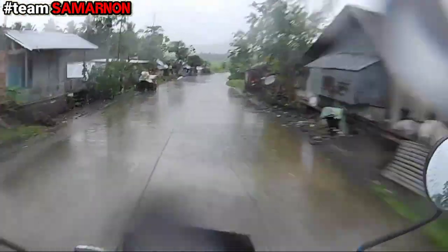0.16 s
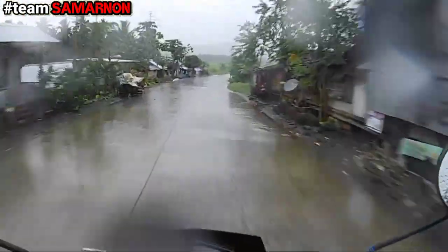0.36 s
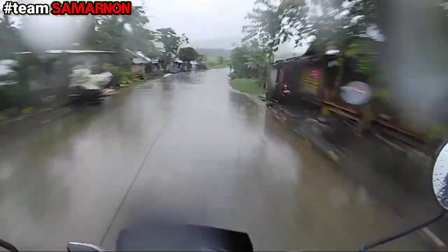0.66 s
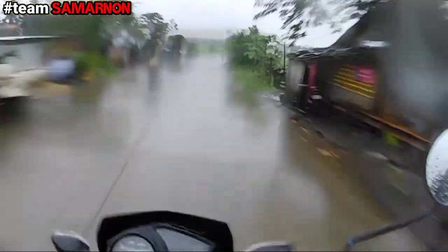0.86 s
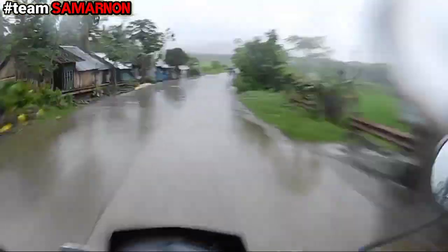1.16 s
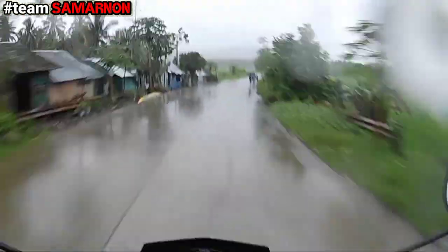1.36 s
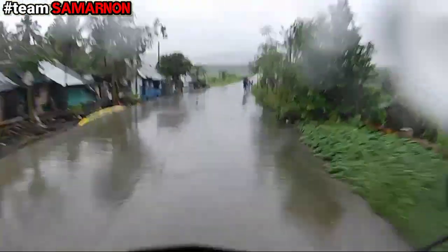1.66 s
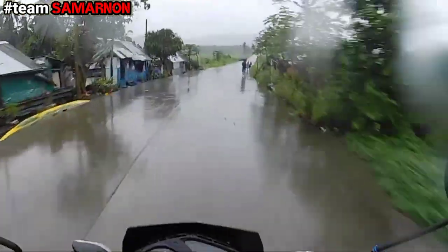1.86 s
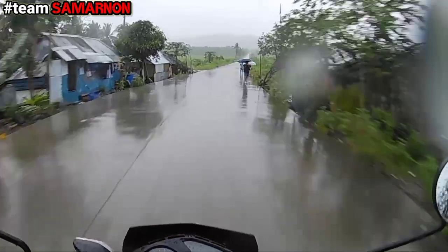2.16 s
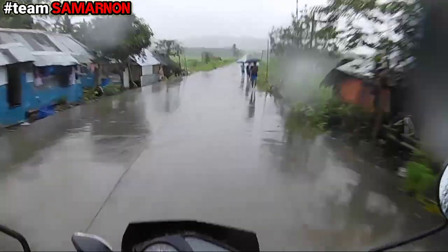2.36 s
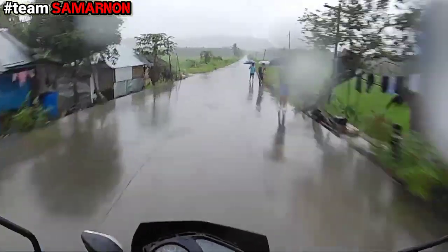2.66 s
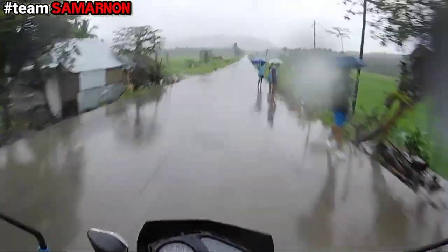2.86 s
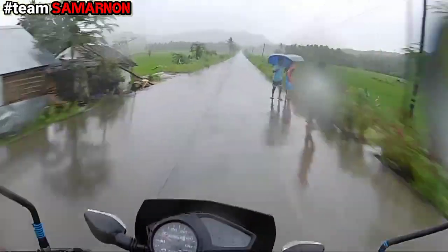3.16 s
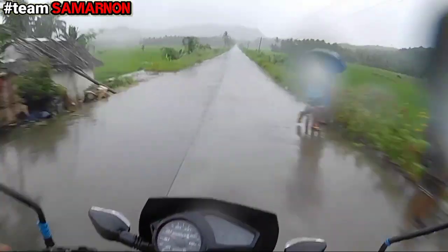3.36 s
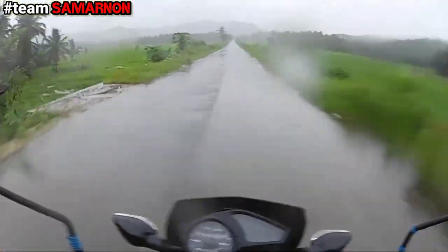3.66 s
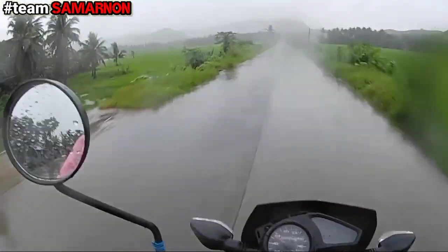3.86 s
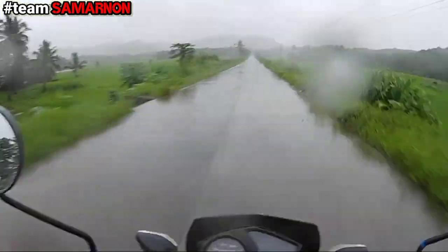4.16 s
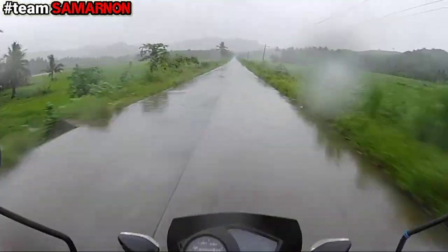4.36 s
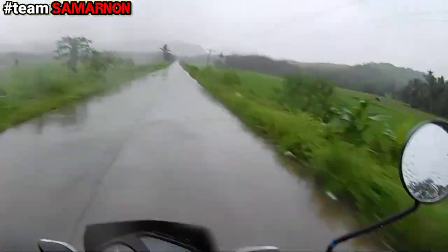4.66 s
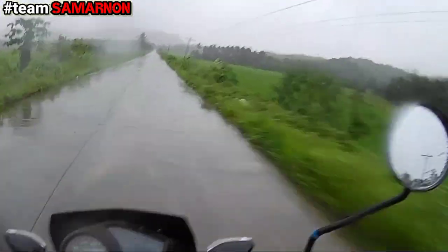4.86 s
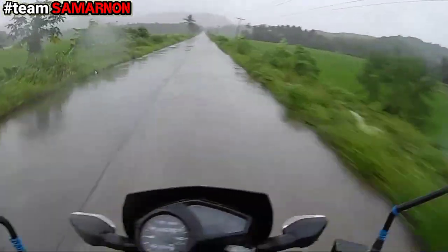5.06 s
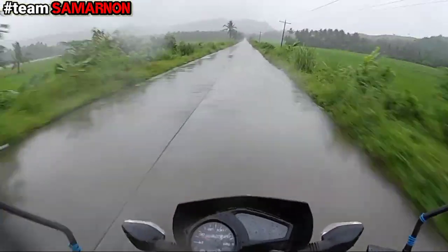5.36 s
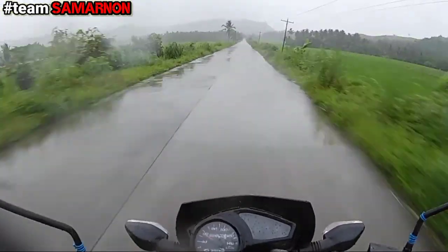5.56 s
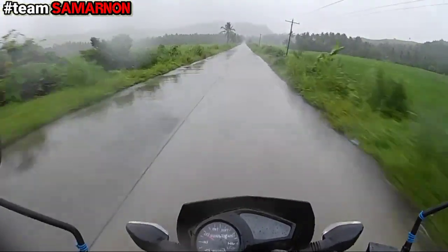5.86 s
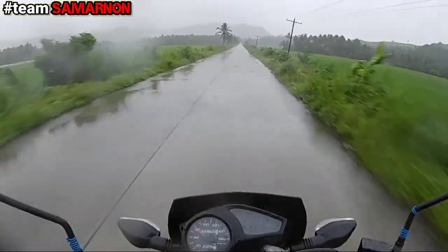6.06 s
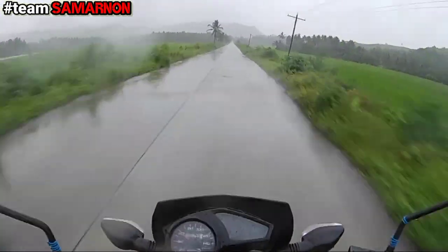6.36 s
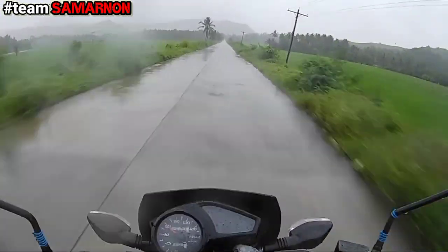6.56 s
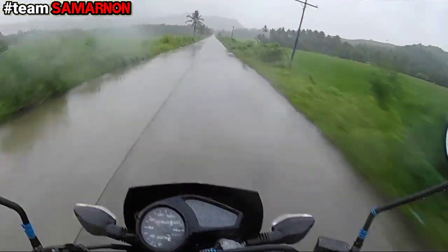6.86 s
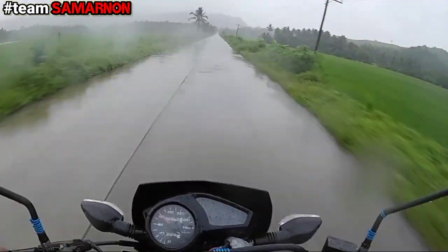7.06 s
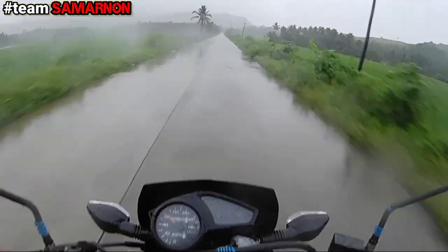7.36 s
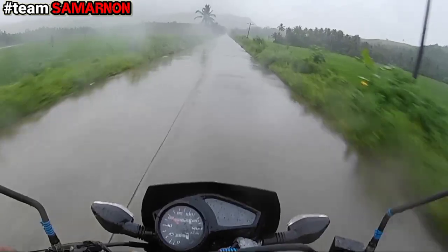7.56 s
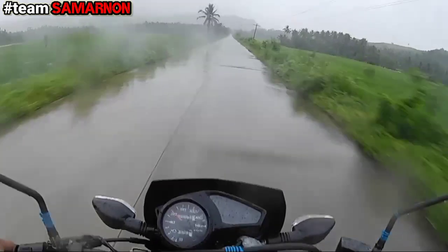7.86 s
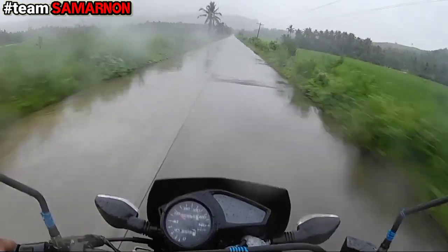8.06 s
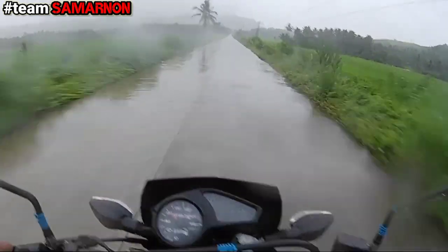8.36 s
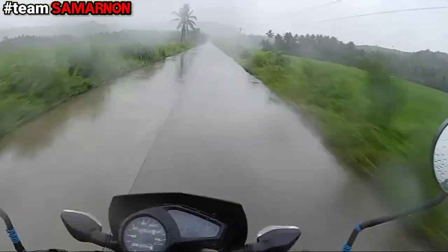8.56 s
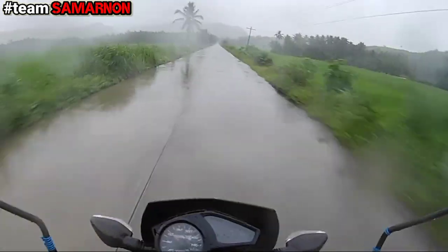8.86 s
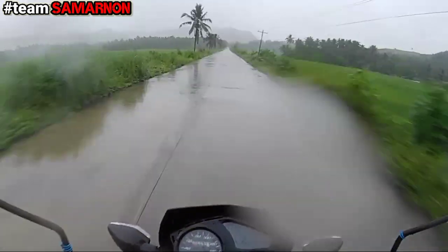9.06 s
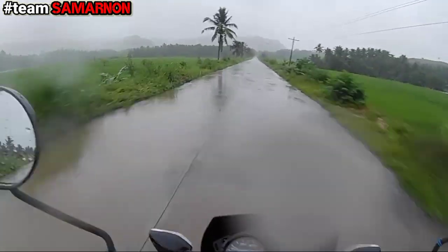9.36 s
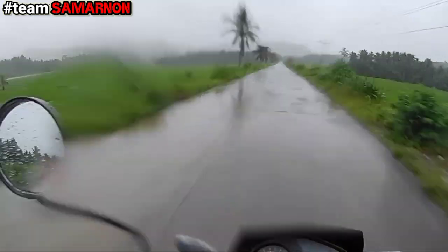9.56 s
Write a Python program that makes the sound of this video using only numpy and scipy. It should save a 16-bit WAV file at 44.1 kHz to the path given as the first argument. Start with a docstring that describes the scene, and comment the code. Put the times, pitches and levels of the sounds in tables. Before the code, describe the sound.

Irregular plastic ticks, knocks and snaps of rain dominate, dry and very close, with finer drops crackling between them. A dim low throb and muffled wind sit behind, growing somewhat stronger after about four seconds. Early on, three quick buzzy horn beeps poke through. The microphone is sealed in a small stiff shell on a motorcycle on an open wet road, so there is no echo and little deep bass in the hits.

```python
"""A low throb and a wind boom with a muffled rush surround a hard plastic camera housing
on a motorcycle in rain; the bed is coloured noise. Heavy drops smack the housing close to the
microphone inside and ring its modes, a short mid-to-treble hiss swelling and fading with each,
and finer drops fall at random between them. The horn is tapped three times: uneven blows ring
its disc and shell. The input stage overloads on the hardest drops."""
import sys
import numpy as np
from scipy import signal
from scipy.fft import rfft, irfft, next_fast_len
from scipy.io import wavfile

SR = 44100
rng = np.random.default_rng(int(sys.argv[2]) if len(sys.argv) > 2 else 0)


def generate_wav(signal):
    """Clip the signal to [-1, 1] and save it as 16-bit WAV at the path in sys.argv[1]."""
    frames = np.transpose(np.atleast_2d(signal))
    scaled = np.clip(frames, -1, 1) * 32767
    pcm = np.round(scaled).astype(np.int16)
    wavfile.write(sys.argv[1], SR, pcm)


N = 428211   # samples, about 9.7 s

# Heavy drops on the housing. Each row: landing time in seconds, then the level in dB (rms over 10 ms)
# of the hollow knock, the body, the shell and the snap, then the strongest shell ring in Hz.
HEAVY_DROPS = [(0.1595, -59, -38, -30.5, -43, 2840), (0.231, -52, -52, -35, -52, 3570),
               (0.244, -40, -32, -36.5, -45, 2510), (0.3047, -61, -31, -33, -46, 2900),
               (0.3514, -47, -53, -37.5, -71, 3790), (0.3794, -51, -37, -38.5, -64, 2980),
               (0.3878, -55, -43, -39, -49, 4870), (0.4097, -59, -36, -33.5, -49.5, 2800),
               (0.5179, -34, -31.5, -30, -52, 4960), (0.5933, -46, -25, -25, -42, 2830),
               (0.7224, -47, -39, -36.5, -61, 3020), (0.7333, -42, -37, -38, -60, 2900),
               (0.7493, -46, -27.5, -30, -61, 3400), (0.8494, -61, -46, -38, -64, 3570),
               (0.97, -38.5, -22.5, -20.5, -34, 2330), (0.9801, -58, -35.5, -32, -58, 2800),
               (1.08, -53, -34, -28.5, -68, 5310), (1.1122, -62, -39, -39, -67, 2900),
               (1.131, -53, -35.5, -34.5, -65, 4500), (1.27, -68, -38.5, -35, -80, 3300),
               (1.3324, -50, -35.5, -36.5, -61, 2880), (1.383, -60, -49, -35.5, -47, 3840),
               (1.387, -45, -37, -37, -63, 2454), (1.405, -28, -25, -24, -40.5, 5120),
               (1.4504, -35, -31.5, -28.5, -46, 4550), (1.4655, -47, -32, -28.5, -60, 3980),
               (1.6202, -46, -31.5, -31.5, -53, 3030), (1.7, -42, -27, -28.5, -39, 4820),
               (1.732, -51, -33.5, -26, -38, 5300), (1.7414, -38, -32.5, -36, -53, 3960),
               (1.8234, -59, -34, -33, -41, 2840), (1.844, -66, -30, -29.5, -46, 2670),
               (2.102, -68, -38, -39, -46, 3100), (2.1163, -47, -30, -28.5, -48, 4670),
               (2.1324, -25, -25.5, -29, -43, 4930), (2.1445, -46, -37, -28, -58, 3820),
               (2.1833, -53, -32, -30, -49, 3750), (2.3398, -42, -23.5, -23, -36.5, 2860),
               (2.435, -70, -48, -39, -49, 5240), (2.7937, -54, -26, -27, -39.5, 2830),
               (2.817, -57, -33, -41, -59, 2830), (2.824, -54, -37, -35, -47, 2780),
               (2.8727, -54, -27, -24, -40, 2860), (3.1117, -65, -42, -34, -73, 3570),
               (3.2189, -61, -55, -39, -64, 3500), (3.317, -46, -38, -48, -64, 2600),
               (3.4225, -63, -38, -52, -54, 3360), (3.4791, -49, -34.5, -26.5, -60, 3490),
               (3.501, -69, -40, -35, -42, 5140), (3.547, -48, -26, -28.5, -68, 4590),
               (3.6218, -44, -20.5, -22.5, -21.5, 2860), (3.677, -55, -27.5, -25, -38.5, 5200),
               (3.751, -33.5, -25.5, -31, -66, 3000), (3.7833, -57, -28.5, -31.5, -58, 3470),
               (3.8165, -35, -27.5, -41, -77, 3530), (3.8838, -59, -32, -41, -43, 3370),
               (3.912, -63, -31.5, -29, -41, 5200), (3.9315, -68, -36, -38, -58, 3550),
               (3.9533, -66, -39, -60, -84, 2760), (3.9887, -28, -25, -31, -40, 3050),
               (4.0122, -37, -28.5, -25.5, -46, 4940), (4.0234, -41, -34, -30.5, -39.5, 2400),
               (4.0666, -47, -42, -35.5, -49, 3820), (4.2038, -60, -36, -34, -40.5, 2780),
               (4.2128, -51, -27, -26.5, -49, 3700), (4.3104, -43, -31.5, -29.5, -45.5, 3550),
               (4.3574, -67, -39, -39.5, -55, 3520), (4.4417, -54, -32.5, -32, -42, 5100),
               (4.469, -57, -33, -32.5, -41, 2970), (4.4811, -66, -33, -29.5, -41, 2860),
               (4.6679, -47, -18.5, -17, -21.5, 2820), (4.6852, -58, -35, -30, -35, 2820),
               (4.696, -62, -27.5, -27, -36, 2740), (4.805, -53, -31.5, -28, -40, 5260),
               (4.9168, -64, -31, -33.5, -54, 3700), (4.9439, -41, -29, -40, -74, 3660),
               (4.9538, -39, -28, -32, -63, 2600), (4.959, -56, -34, -33.5, -60, 3230),
               (4.9929, -54, -31, -35.5, -66, 4720), (5.0009, -50, -42, -34, -50, 3850),
               (5.2075, -44, -48, -41, -56, 3780), (5.2231, -52, -22, -22, -47, 3460),
               (5.237, -32, -36, -31.5, -38, 3680), (5.2482, -64, -39, -50, -51, 2700),
               (5.4411, -41, -32, -44.5, -66, 5100), (5.4937, -55, -33, -34.5, -52, 2760),
               (5.5123, -54, -33.5, -34, -54, 2820), (5.54, -60, -38, -37, -50, 4560),
               (5.5719, -44, -22, -19.5, -26.5, 2850), (5.5862, -47, -34, -32, -44, 3140),
               (5.7431, -60, -36, -31.5, -37.5, 2830), (5.8, -58, -42, -35.5, -67, 3060),
               (5.8152, -65, -40, -37, -54, 2890), (5.8399, -59, -40, -32.5, -63, 3500),
               (6.0586, -46, -29.5, -29, -43, 4960), (6.1045, -64, -41, -40, -45, 5120),
               (6.1789, -55, -36, -38, -40.5, 4890), (6.2053, -50, -29, -28, -57, 4600),
               (6.2285, -53, -38, -31.5, -44, 5760), (6.3764, -52, -37, -34.5, -70, 3630),
               (6.4122, -56, -34.5, -33.5, -49, 2910), (6.5194, -43, -29, -29.5, -40, 3140),
               (6.5242, -57, -38, -29.5, -46, 4900), (6.563, -59, -38.5, -35, -45.5, 4480),
               (6.7195, -44, -26.5, -20.5, -24.5, 5130), (6.9582, -66, -57, -38, -51, 5020),
               (6.9879, -60, -28, -25, -35, 2830), (6.9963, -45, -34, -31, -42, 2870),
               (7.0727, -67, -41, -36, -57, 3100), (7.1406, -56, -37, -57, -68, 3040),
               (7.1498, -39, -31.5, -25.5, -60, 3580), (7.1643, -52, -30, -30, -42.5, 2930),
               (7.1972, -45, -31, -31, -47, 3550), (7.2288, -45, -24, -28, -46, 2830),
               (7.3571, -55, -44, -39, -58, 2960), (7.486, -42, -26, -34.5, -53, 5100),
               (7.5026, -49, -42, -37, -58, 3000), (7.5149, -52, -39, -39, -46, 4700),
               (7.534, -45, -42, -36, -50, 2680), (7.7103, -49, -29, -26, -40.5, 2800),
               (7.8523, -55, -41, -35, -49, 2760), (7.865, -56, -37, -37.5, -72, 2930),
               (7.957, -56, -39, -32, -55, 3600), (7.9702, -59, -31.5, -27, -37, 4930),
               (8.1244, -54, -40, -36, -46.5, 4650), (8.2467, -60, -34.5, -42, -52, 2480),
               (8.25, -59, -35, -30.5, -49, 4610), (8.2944, -44, -34, -33.5, -48, 3830),
               (8.3535, -49, -45, -37, -57, 3850), (8.5052, -64, -37, -39, -43.5, 4660),
               (8.5209, -44, -37, -30, -54, 2740), (8.5321, -43, -29, -25.5, -63, 3150),
               (8.725, -48, -30, -30.5, -43, 4900), (8.7855, -65, -35, -45, -46.5, 2850),
               (8.7989, -67, -56, -32, -62.5, 3740), (8.8145, -63, -38.5, -36, -41, 4930),
               (8.9216, -60, -37, -34.5, -42, 2900), (8.939, -48, -33.5, -33, -42, 2820),
               (8.96, -68, -36, -31.5, -42, 5300), (9.0049, -44, -37.5, -43, -43, 2950),
               (9.0152, -69, -34, -52, -44, 2980), (9.0328, -35, -30, -18.5, -31, 3730),
               (9.076, -68, -55.5, -39.5, -68, 4760), (9.128, -74, -38, -37.5, -61, 4750),
               (9.151, -63, -40, -36.5, -48, 2820), (9.163, -60, -38, -40, -56, 3580),
               (9.2002, -66, -33.5, -29.5, -65, 3500), (9.2427, -54, -28.5, -25, -35, 2930),
               (9.2724, -41, -18, -18.5, -21, 3164), (9.3696, -62, -39, -34.5, -65, 3610),
               (9.4401, -66, -31.5, -32, -38, 5060), (9.5463, -42, -37, -29, -33, 5160),
               (9.6558, -41, -31, -41, -40.5, 3200)]


def from_db(db):
    """Decibels to amplitude gain."""
    return 10 ** (np.asarray(db) / 20)


def rms_one(x):
    """Scale to unit rms."""
    return x / np.sqrt(np.mean(x ** 2) + 1e-20)


def drift(rate_hz):
    """Slow random wandering: noise twice through a one-pole low-pass at rate_hz, brought to unit rms."""
    step = 40   # samples between drawn points
    pole = np.exp(-2 * np.pi * rate_hz * step / SR)
    noise = rng.standard_normal(N // step + 2002)
    slow = signal.lfilter([1], [1, -2 * pole, pole ** 2], noise)[2000:]   # the filter has settled
    return np.interp(np.arange(N) / step, np.arange(len(slow)), rms_one(slow))


def rms_10ms_one(sounds):
    """Scale each short sound so that its energy, spread over 10 ms, has unit rms."""
    return sounds / np.sqrt(np.sum(sounds ** 2, axis=-1, keepdims=True) / (SR / 100))


def squeezed_air(size, phase):
    """Air trapped under a hard drop squeaks upward in pitch as it is squeezed out."""
    first_hz, last_hz, duration_s = 7500, 12940, 0.00256
    through = np.minimum(np.arange(size) / SR / duration_s, 1)
    pitch_hz = first_hz * (last_hz / first_hz) ** through
    swell = np.sin(np.pi * through)
    return rms_10ms_one(swell * np.sin(2 * np.pi * np.cumsum(pitch_hz) / SR + phase))


def strike_housing(at, parts_db, ring_hz, size=1600):
    """Each drop strikes every mode with its own strength and phase; the water film detunes them a little."""
    # Modes of the plastic housing. Each row: frequency in Hz, relative level in dB, 60 dB decay in seconds.
    modes = [(694.4, -18, 0.035), (1341, 1.5, 0.0085), (1507, -1, 0.011), (1857, -3.5, 0.0098),
             (2868, -0.5, 0.011), (3550, 0.5, 0.0082), (4574, -2.5, 0.01), (5100, -1.5, 0.01),
             (6475, -4, 0.012), (7280, 9, 0.0027), (8810, 0.5, 0.0049), (10330, -16.5, 0.0024),
             (12200, -24, 0.0038), (14100, -28, .003)]
    # Edges in Hz between knock, body, shell and snap.
    part_edges_hz = [900, 2300, 6100]
    rise_s, detune, scatter_db = 0.00019, 0.052, 2.5   # detune is a fraction of the mode's frequency
    favour_db_per_octave = 7.5
    squeak_from_db, squeak_slope = -29.5, 1.87   # snap level where the squeak takes over; dB gained per dB

    t = np.arange(size) / SR
    chance = rng.standard_normal((len(at), len(modes), 2))
    phase = 2 * np.pi * rng.random((len(at), len(modes)))
    parts = np.zeros((len(part_edges_hz) + 1, len(at), size))
    rise = (1 - np.exp(-t / rise_s)) ** 2   # the drop flattens over a fraction of a millisecond
    distance = np.abs(np.log(ring_hz[:, None] / np.array(modes)[:, 0]))
    nearest = np.argmin(distance, axis=1)   # this mode is tuned to the drop's strongest ring
    for k, (hz, level_db, t60) in enumerate(modes):
        part = np.searchsorted(part_edges_hz, hz)
        pitch = np.where(nearest == k, ring_hz, hz * (1 + detune * chance[:, k, 0]))
        # the landing spot favours one shell mode
        spot_db = -favour_db_per_octave * np.abs(np.log2(pitch / ring_hz)) * (part == 2)
        gain = from_db(level_db + spot_db + scatter_db * chance[:, k, 1])
        decay = from_db(-60 * t / t60)
        ring = np.sin(2 * np.pi * pitch[:, None] * t + phase[:, k, None])
        parts[part] += gain[:, None] * rise * decay * ring
    parts = rms_10ms_one(parts)

    # the louder the snap, the more of its power is squeak
    ringing_to_squeak = from_db(squeak_slope * (squeak_from_db - parts_db[-1])) ** 2
    share = 1 / (1 + ringing_to_squeak)[:, None]
    squeak = squeezed_air(size, phase[:, :1])
    parts[-1] = np.sqrt(1 - share) * parts[-1] + np.sqrt(share) * squeak

    ticks = np.sum(parts * from_db(parts_db)[..., None], axis=0)
    places = at[:, None] + np.arange(size)
    return np.bincount(places.ravel(), ticks.ravel(), N + size)[:N]


def hiss_after(ticks):
    """A short mid-to-treble hiss that swells and fades with each drop, following its strength."""
    # Lower and upper edge of the hiss in Hz.
    band_hz = [2900, 6900]
    level_db, smoothing_s = -22, 0.0055   # level relative to the drop's strength
    pole = np.exp(-1 / (smoothing_s * SR))
    strength = np.sqrt(signal.lfilter([1 - pole], [1, -pole], ticks ** 2 + 1e-18))
    band = signal.butter(2, band_hz, "band", fs=SR, output="sos")
    hiss = signal.sosfilt(band, rng.standard_normal(N))
    return from_db(level_db) * strength * rms_one(hiss)


def heavy_drops():
    """Heavy drops ring the housing where they land, each with a short hiss."""
    s, *parts_db, ring_hz = np.transpose(HEAVY_DROPS)
    ticks = strike_housing(np.round(s * SR).astype(int), parts_db, ring_hz)
    stiff_shell = signal.butter(2, 454, "high", fs=SR, output="sos")   # small and stiff: little bass
    ticks = signal.sosfilt(stiff_shell, ticks)
    return ticks + hiss_after(ticks)


def drizzle():
    """Small drops strike the housing at random, mostly faint, some duller and some brighter."""
    # Level in dB of the faintest drops, before the scatter in colour: knock, body, shell, snap.
    faintest_db = (-72, -59, -61.5, -77.5)
    drops_per_s, size_spread_db = 95, 4.5   # the rate wanders around this figure
    chance_per_sample = drops_per_s * from_db(4 * drift(5.0)) / SR
    at = np.flatnonzero(rng.random(N) < chance_per_sample)
    size_db = size_spread_db * np.minimum(rng.exponential(1, len(at)), 4)
    colour_db = 4 * rng.standard_normal((len(at), len(faintest_db))).T
    # shell rings are drawn from those of the heavy drops
    ring_hz = np.array(HEAVY_DROPS)[rng.integers(0, len(HEAVY_DROPS), len(at)), -1]
    return strike_housing(at, np.add.outer(faintest_db, size_db) + colour_db, ring_hz, size=600)


def resonance(x, hz, width_hz):
    """Two-pole resonance with a peak gain of 1."""
    pole = np.exp(-np.pi * width_hz / SR)
    feedback = [1, -2 * pole * np.cos(2 * np.pi * hz / SR), pole ** 2]
    return signal.lfilter(np.array([1, 0, -1]) * (1 - pole ** 2) / 2, feedback, x + 1e-18)


def horn():
    """The armature hits the pole piece once a cycle, unevenly; the disc rings and throbs."""
    # Horn taps; the buzz sags as the diaphragm swings up. Each row: start in seconds, end in seconds,
    # first buzz in Hz, last buzz in Hz, level in dB of each overtone ahead of the disc and shell.
    taps = [(1.829, 1.891, 439, 423, -33), (1.915, 1.959, 438, 436, -31.5), (2.021, 2.086, 444, 430, -29)]
    # Resonances of disc and shell. Each row: frequency in Hz, width in Hz of each of two passes, gain in dB.
    disc_and_shell = [(430, 120, -18), (2230, 190, -12), (2623, 160, 8), (2980, 200, -1),
                      (6950, 420, -22.5)]
    jitter, throb_hz, throb_db, flutter_db = 0.029, 43.7, -1.5, 3.5   # jitter is a fraction of a cycle

    t, blows = np.arange(N) / SR, np.zeros(N)
    for start, end, first_hz, last_hz, level_db in taps:
        cycles = round((end - start) * (first_hz + last_hz) / 2)
        buzz_hz = np.linspace(first_hz, last_hz, cycles)
        unevenness = jitter / buzz_hz * rng.standard_normal(cycles)
        at_s = start + np.cumsum(1 / buzz_hz) + unevenness - 1 / first_hz
        # pulse height that gives each overtone the tap's rms
        height = np.sqrt(SR ** 2 / 2) / buzz_hz / 2 * from_db(level_db)
        blows[np.round(at_s * SR).astype(int)] = height
    throb = throb_db * np.sin(2 * np.pi * throb_hz * t)
    blows *= from_db(throb + flutter_db * drift(90.0))

    out = np.zeros(N)
    for hz, width_hz, gain_db in disc_and_shell:
        once = resonance(blows, hz, width_hz)
        out += from_db(gain_db) * resonance(once, hz, width_hz)
    return out


def patchy_noise(spectrum, patchy_db, rate_hz):
    """Noise of the given colour; each octave swells partly with the others, partly alone; rms 1."""
    size = next_fast_len(N)
    hz = np.maximum(np.arange(size // 2 + 1) * SR / size, 1)
    table_hz, table_db = np.array(spectrum).T
    colour_db = np.interp(np.log(hz), np.log(table_hz), table_db)
    coloured = from_db(colour_db) * rfft(rng.standard_normal(size))
    out, together = 0, drift(rate_hz)
    for octave in np.arange(np.floor(np.log2(table_hz[0])), np.log2(table_hz[-1]) + 1):
        share = np.clip(1 - np.abs(np.log2(hz) - octave), 0, 1)   # overlapping bands that sum to one
        swell = from_db(patchy_db * (.5 * together + drift(rate_hz)))
        out = out + swell * irfft(coloured * share, size)[:N]
    return rms_one(out)


def throb_and_wind():
    """A low throb, probably the engine through the frame, a wind boom, and a rush through the housing wall."""
    # The bed over time. Each row: time in seconds, then the level in dB of low throb, wind boom and rush.
    bed_levels = [(0.0, -46, -47, -51), (0.51, -41.5, -42.5, -49.5), (0.89, -51.5, -47.5, -52.5),
                  (0.97, -35.5, -46, -50), (1.13, -45.5, -43, -48), (2.0, -41, -45, -48),
                  (2.19, -49.5, -45, -49), (2.73, -44.5, -45.5, -50.5), (3.84, -38.5, -39, -44),
                  (4.22, -43, -39, -47), (6.38, -39, -41, -45), (6.49, -43, -36, -46.5),
                  (6.92, -39, -38.5, -44.5), (8.98, -41, -41, -45.5), (9.22, -30, -36, -42),
                  (9.27, -43, -38, -46), (9.71, -33.5, -37.5, -43.5)]
    # A low throb near 41 Hz, probably the engine through the frame, and a wind boom near 105 Hz.
    # Each row: frequency in Hz, relative dB per Hz.
    low_spectrum = [(7, -25), (14, -9.5), (30, -8), (41, 0), (55, -8.5), (75, -5.5), (105, -2), (125, -6.5),
                    (165, -14.5), (270, -22), (480, -29), (780, -47)]
    # Rush through the housing wall. Each row: frequency in Hz, relative dB per Hz.
    rush_spectrum = [(250, -19), (420, -16.5), (672, -3), (875, -9), (1460, 3.5), (2270, -7.5), (2830, -5),
                     (3500, -14), (5200, -19), (5800, -28.5), (9200, -32), (10500, -53), (15000, -73)]

    s, *levels_db = np.transpose(bed_levels)
    throb, boom, rush = [from_db(np.interp(np.arange(N) / SR, s, db)) for db in levels_db]
    rumble = patchy_noise(low_spectrum, patchy_db=0.86, rate_hz=4.7)
    size = 2 ** 19
    below_62_hz = np.arange(size // 2 + 1) * SR / size < 62   # splits throb from boom
    low = irfft(rfft(rumble, size) * below_62_hz)[:N]
    throb_and_boom = throb * rms_one(low) + boom * rms_one(rumble - low)
    return throb_and_boom + rush * patchy_noise(rush_spectrum, patchy_db=1.7, rate_hz=37.0)


def scene():
    """Everything reaches one microphone inside the housing."""
    return (throb_and_wind() + horn() + heavy_drops() + drizzle())[None]


def record(dry):
    """The input stage overloads softly on the hardest drops; the treble is cut 70 dB from 16.4 kHz up."""
    limit, knee = .42, 4   # full-scale amplitude; a higher knee bends more sharply
    clipped = dry / (1 + np.abs(dry / limit) ** knee) ** (1 / knee)
    return signal.sosfilt(signal.cheby2(12, 70, 16400, fs=SR, output="sos"), clipped)


dry = scene()
out = record(dry)
generate_wav(out)
```